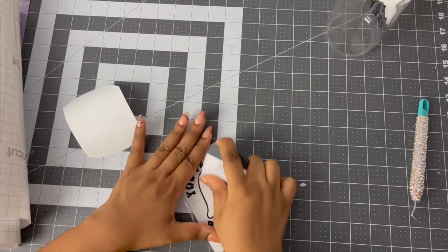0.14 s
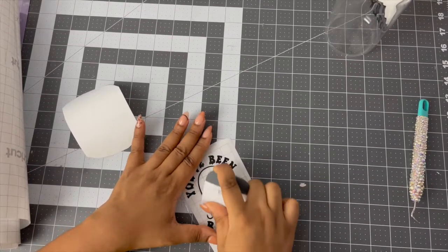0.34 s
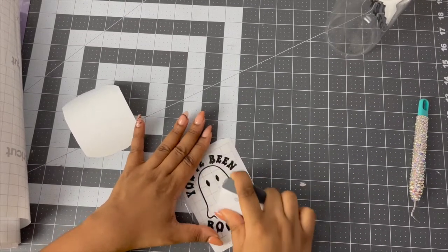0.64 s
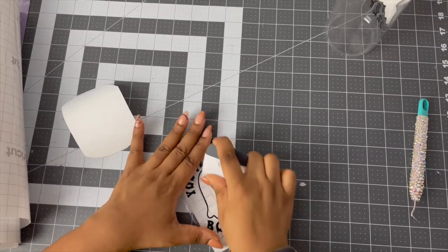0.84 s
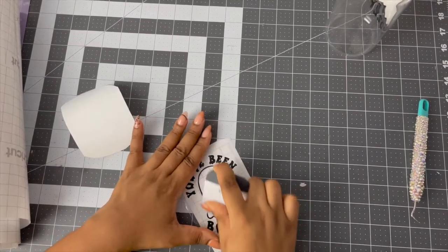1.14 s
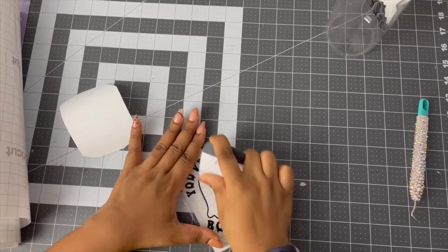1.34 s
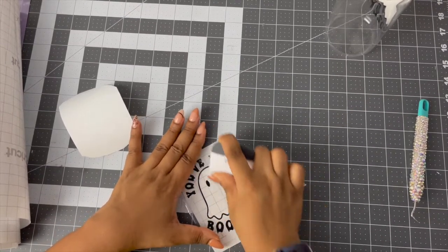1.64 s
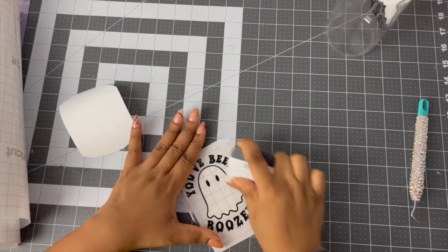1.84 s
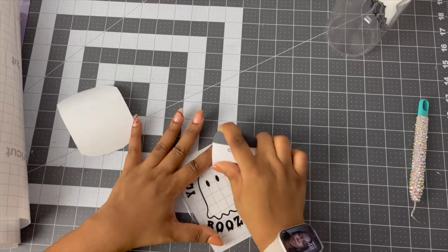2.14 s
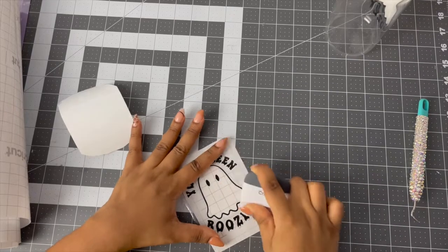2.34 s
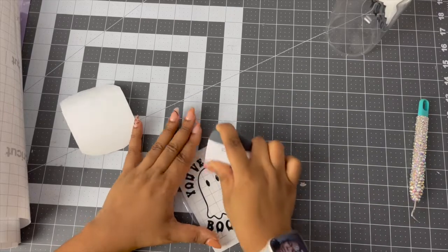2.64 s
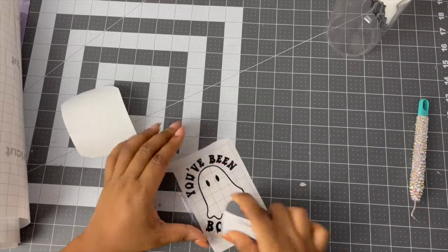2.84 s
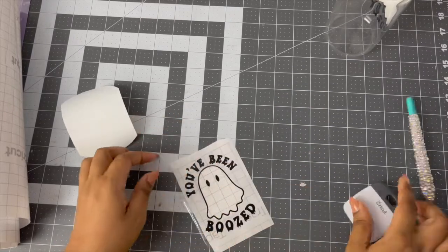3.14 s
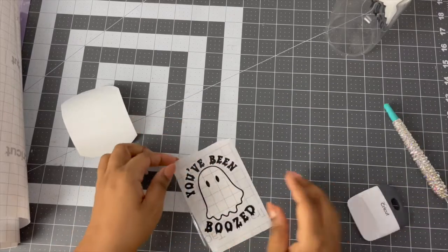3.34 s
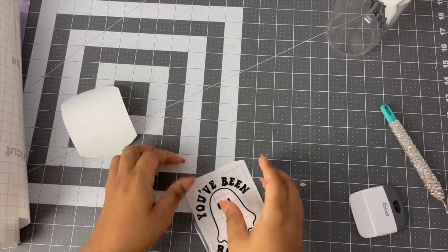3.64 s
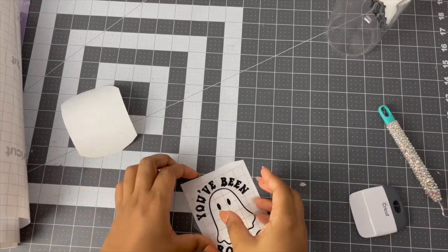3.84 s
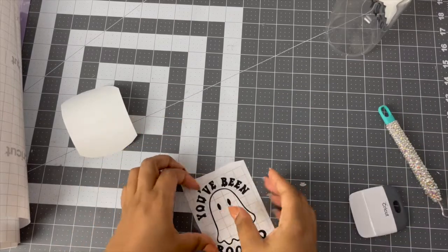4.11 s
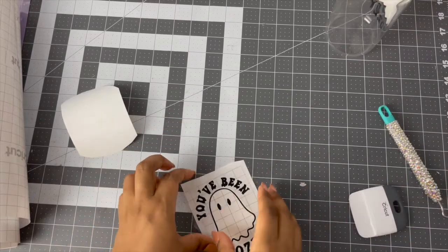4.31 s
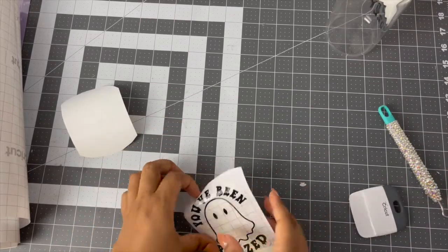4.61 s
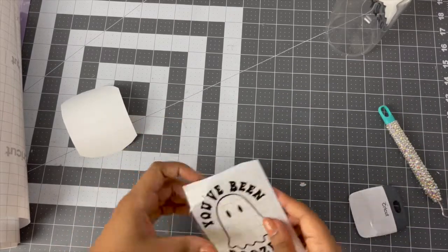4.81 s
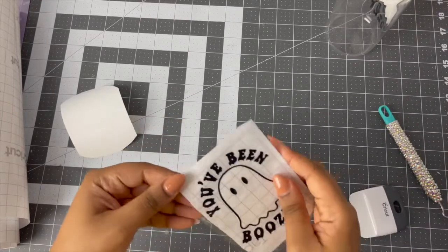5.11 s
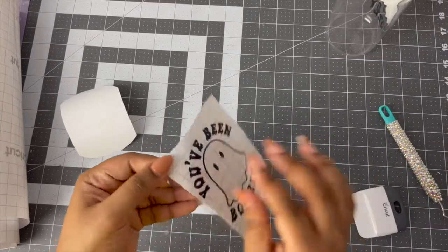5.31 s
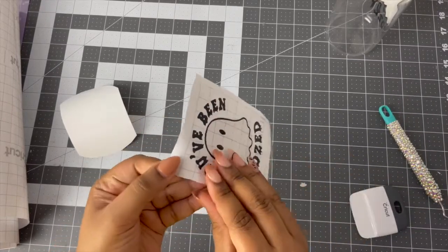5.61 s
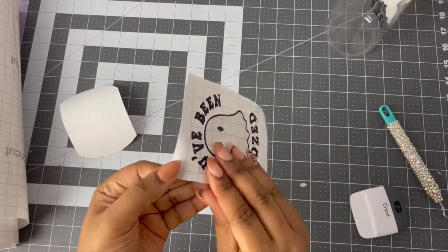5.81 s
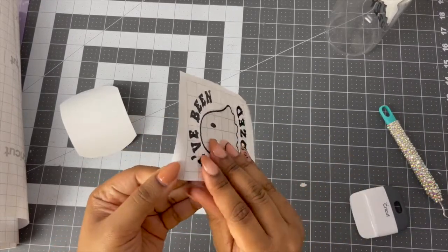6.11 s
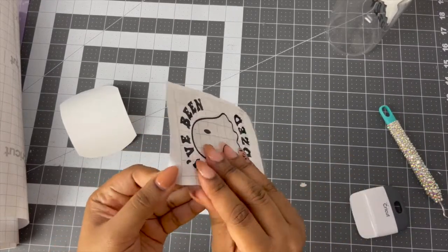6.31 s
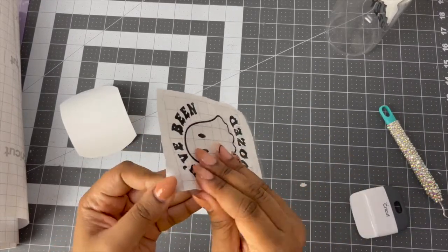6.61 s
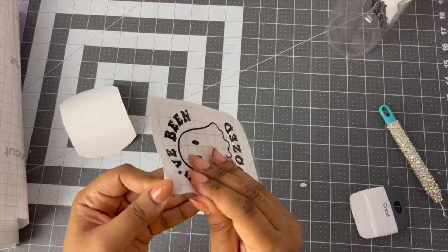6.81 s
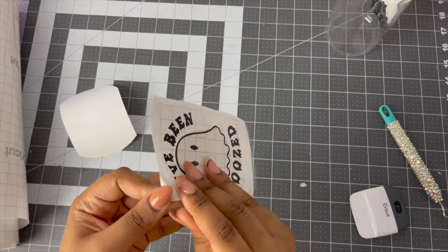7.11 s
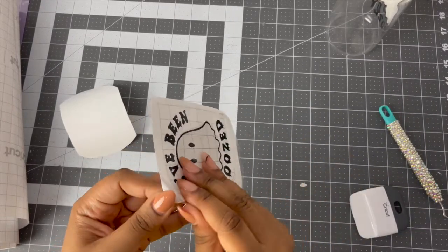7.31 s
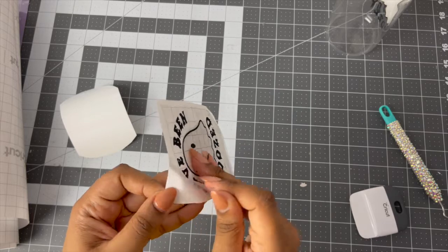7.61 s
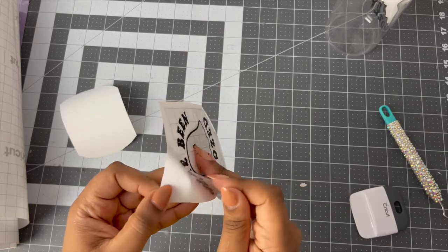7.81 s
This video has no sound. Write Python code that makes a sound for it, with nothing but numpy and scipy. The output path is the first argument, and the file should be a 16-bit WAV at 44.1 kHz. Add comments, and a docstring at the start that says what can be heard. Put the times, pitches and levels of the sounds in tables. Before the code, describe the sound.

A small room with low ventilation rumble and a faint wavering hum, heard close above a work desk. From 0 to about 2.75 s, a plastic scraper rubs to and fro over film at an even pace, nearly five passes a second; each hisses and rasps softly while the desk rumbles and bumps irregularly. Pressure grows around 1.6-1.9 s, a low thud comes at 2.0 s, and bright hard ticks stand out at 1.6, 1.77, 2.66 and 2.75 s. At 3.0-3.45 s the scraper is put down: a cluster of hollow knocks, a short drag, the loudest clack at 3.3 s. From 3.6 to 4.8 s stiff film snaps and crinkles, strongest near 3.94 and 4.38 s, with a knock at 4.06 s and brief scrapes. From 5 to 8 s only sparse small crackles, faint finger slides and tiny nail picks remain, a few bunching near 7.8 s.

```python
"""Scraping and picking at a decal on a cutting mat

A plastic scraper burnishes a vinyl decal: each stroke bumps the desk and hisses over the tape.
Then it is put down, the decal is slid off the mat, and its stiff film snaps and crinkles as a corner is picked.
Rubbing is filtered noise with tiny slips; knocks and snaps are short noise bursts that set resonances ringing.
A small room with a low hum is heard around it, through two closely spaced microphone ports.
"""
import sys
import numpy as np
from scipy import signal
from scipy.fft import rfft, irfft, next_fast_len
from scipy.io import wavfile

SR = 44100
rng = np.random.default_rng(int(sys.argv[2]) if len(sys.argv) > 2 else 0)


def log_audio(samples):
    """Write samples as a 16-bit WAV file to the path given in sys.argv[1]."""
    # one column per channel
    frames = np.atleast_2d(samples).T
    # limit to full scale, then quantise
    limited = np.clip(frames, -1, 1)
    pcm = np.round(limited * 32767).astype(np.int16)
    wavfile.write(sys.argv[1], SR, pcm)


N = 350595
TIME = np.arange(N) / SR

# Tone of hard, bright contacts: (frequency [Hz], relative level [dB])
TICK_TONE = [(900, -19.5), (3500, -14.5), (6200, -2), (8300, -7.5), (10400, 9), (11700, -4), (16000, -34)]
# Resonances of the desk: (frequency [Hz], width [Hz], relative level [dB])
DESK_MODES = [(223, 46.3, 9), (331, 29.8, 3), (397.6, 30, 5), (481.3, 27, 2.5), (573, 67, -6)]
# Lowest resonances of the desk: (frequency [Hz], width [Hz], relative level [dB])
DESK_BOOM_MODES = [(118.7, 3.9, 17), (62, 8.7, 4)]
# Resonances of the mat: (frequency [Hz], width [Hz], relative level [dB])
MAT_MODES = [(656, 110, 27.7), (950, 25, 5.8), (1098, 140, 22), (2070, 510, 12.9)]
# Resonances of the bending film: (frequency [Hz], width [Hz], relative level [dB])
FILM_BEND_MODES = [(2090, 420, 0.5), (2870, 800, 0), (3700, 600, 0), (4500, 600, -3)]
# Scraper, card and nails knock on the mat: (time [s], level [dB], level of the desk thump [dB])
MAT_KNOCKS = [(3.0013, -33, -49), (3.0392, -36.5, -53), (3.0518, -33.5, -45), (3.1052, -33.5, -46.5),
              (3.1309, -38.5, -51.5), (3.249, -47, -52.5), (3.3085, -21.5, -51), (3.4331, -38, -45.5),
              (4.0607, -30, -56), (4.365, -48, -49.5)]


def from_db(db):
    """Decibels to gain."""
    return 10 ** (np.asarray(db) / 20)


def rms_one(x):
    """Scale to an average (rms) level of 1."""
    return x / np.sqrt(np.mean(x ** 2) + 1e-20)


def at_hz(points, hz):
    """Read a table between its points, on a log-frequency axis."""
    known, values = np.transpose(points)
    return np.interp(np.log(np.maximum(hz, 1)), np.log(known), values)


def add(track, s, sound):
    """Mix a sound into a track at time s."""
    start = max(round(s * SR), 0)
    track[start:start + len(sound)] += sound[:N - start]


def drift(per_s):
    """Random wandering with spread 1: straight lines between chance values, per_s of them a second."""
    knots = rng.standard_normal(4000)
    return rms_one(np.interp(TIME * per_s, np.arange(len(knots)), knots))


def colour(x, spectrum):
    """Filter to the given spectrum without sounding early, falling away below its first point."""
    size = next_fast_len(2 * len(x), True)
    hz = np.arange(size // 2 + 1) * SR / size
    gain = from_db(at_hz(spectrum, hz)) * np.clip(hz / spectrum[0][0], 1 / 20, 1) ** 2
    # folding the cepstrum gives the minimum-phase version of this gain
    cepstrum = irfft(np.log(gain), size)
    cepstrum[1:size // 2] *= 2
    cepstrum[size // 2 + 1:] = 0
    response = np.exp(rfft(cepstrum))
    return irfft(rfft(x, size) * response, size)[:len(x)]


def resonate(x, modes):
    """Let resonances ring side by side, with alternating sign; a narrow one rings longer."""
    out = 0
    for k, (hz, width, db) in enumerate(modes):
        r = np.exp(-np.pi * width / SR)
        poles = [1, -2 * r * np.cos(2 * np.pi * hz / SR), r * r]
        ring = signal.lfilter([1, 0, -1], poles, x + 1e-18)
        out = out + (-1) ** k * from_db(db) * (1 - r * r) / 2 * ring
    return out


def cut(x, hz, kind, order=2):
    """Butterworth filter: "low" keeps what lies below hz, "high" what lies above."""
    return signal.sosfilt(signal.butter(order, min(hz, SR / 2 - 1), kind, fs=SR, output="sos"), x)


def sized(x, db, span_s):
    """Give a short sound the energy of a level db held for span_s."""
    return from_db(db) * x * np.sqrt(span_s * SR / (np.sum(x ** 2) + 1e-20))


def slips(per_s, spread_db, count):
    """Tiny slips at random moments, of uneven size and sign."""
    sizes = from_db(spread_db * np.minimum(rng.exponential(1, count), 4))
    happens = rng.random(count) < per_s / SR
    return sizes * rng.choice([-1, 1], count) * happens


def buckle(settle_s, flutter):
    """One sudden jump, then a dying flutter of random ones."""
    t = TIME[:SR // 10]
    jumps = rng.standard_normal(len(t)) * (np.exp(-t / settle_s) + flutter * np.exp(-t / 0.0096))
    jumps[0] = 2
    return jumps


def ports(x):
    """The right port lags the left, most around two treble resonances; the left is slightly louder."""
    right = x
    for hz, width in [(4750, 150), (9500, 4000)]:
        r = np.exp(-np.pi * width / SR)
        poles = [1, -2 * r * np.cos(2 * np.pi * hz / SR), r * r]
        right = signal.lfilter(poles[::-1], poles, right)  # all-pass: delays without changing the level
    return np.array([x * from_db(0.63), right])


def diffuse(common, apart, apart_db):
    """Sound from all around: a shared part, plus a part of opposite sign at the two ports."""
    # Tone of the part that differs between the ports: (frequency [Hz], relative level [dB])
    apart_tone = [(300, -5), (700, 8), (1250, -2), (3300, 4), (6000, 3.5), (12000, -31.5)]
    return ports(common) + from_db(apart_db) * ports(colour(apart, apart_tone)) * [[1], [-1]]


def background():
    """Low ventilation rumble from filtered noise, with a wavering hum of noise through narrow resonances."""
    # Tone of the rumble: (frequency [Hz], relative level [dB])
    room_tone = [(25, -32), (45, -3.5), (80, -11), (150, -20), (230, -17), (290, -30), (450, -24.5),
                 (630, -44), (2100, -50), (5000, -61), (11000, -59), (14000, -92)]
    # Hum resonances: (frequency [Hz], width [Hz], relative level [dB])
    hum_modes = [(60.2, 5.2, 1), (123.17, 2.4, 0.41)]
    common, apart = (rms_one(colour(rng.standard_normal(N), room_tone)) for _ in range(2))
    hum = rms_one(cut(resonate(rng.standard_normal(N), hum_modes), 270, "low"))
    return from_db(-50.0) * diffuse(common, apart, apart_db=-3.0) + from_db(-51.5) * hum


def room(x):
    """Dense reflections: bands of noise that each die away at their own rate."""
    # Time for reflections to fall by 60 dB: (frequency [Hz], time [s])
    decay_times = [(1000, 0.66), (6000, 0.34), (11000, 0.34), (16000, 0.081)]
    t, edges = TIME[:SR // 2], np.geomspace(80, 16000, 9)
    tails = np.zeros((2, len(t)))
    for low, high in zip(edges, edges[1:]):
        band = cut(rng.standard_normal(tails.shape), low, "high", order=4)
        band = cut(band, high, "low", order=4)
        tails += band * from_db(-60 * t / at_hz(decay_times, np.sqrt(low * high)))
    tails *= 1 - np.exp(-(t / 0.0007) ** 2)  # soft start
    common, apart = (signal.fftconvolve(x, tail / np.linalg.norm(tail))[:N] for tail in tails)
    return diffuse(common, apart, apart_db=-2.5)


def pressure_db(s):
    """How hard the scraper is pressed at time s."""
    # Pressure on the scraper: (time [s], level [dB])
    pressing = [(0.1, 2.5), (0.7, -2), (0.95, 1.5), (1.4, 4), (1.62, 7), (1.83, 10.5), (2.05, 0),
                (2.45, 4.5), (2.65, 8)]
    return np.interp(s, *np.transpose(pressing))


def speed(start, end):
    """A pass gathers speed and slows again towards its end."""
    out, inside = np.zeros(N), (TIME > start) & (TIME < end)
    out[inside] = np.sin(np.pi * (TIME[inside] - start) / (end - start)) ** 0.82
    return out


def burnishing():
    """Effort of the scraper, to and fro at an even pace: speed times pressure, a little more on each way back."""
    first_s, pass_s, passes = 0.022, 0.2115, 13
    return_gain_db = 1
    moving = np.zeros(N)
    for k in range(passes):
        start = first_s + pass_s * k
        moving += from_db(return_gain_db * (k % 2)) * speed(start, start + pass_s)
    return moving * from_db(pressure_db(TIME))


def rumble():
    """The desk rumbles unevenly under the moving scraper, and sways once with a thud as the hand leans in."""
    uneven = rng.standard_normal(N) * from_db(6.3 * drift(35))
    out = from_db(-50.5) * burnishing() * rms_one(cut(resonate(uneven, DESK_MODES), 1200, "low"))
    thud_s, thud_db = 1.995, -38
    age = TIME[:SR // 2] / 0.027
    push = rng.standard_normal(len(age)) * age * np.exp(-age)
    sway = resonate(push, [(56.4, 16, 0)])  # frequency Hz, width Hz, dB
    add(out, thud_s, sized(cut(sway, 110, "low"), thud_db, 0.073))
    return out


def bump(ring_db, chatter_db, boom_db):
    """An edge judders along: the mat chatters first, the desk rings, and its lowest modes swell last."""
    t = TIME[:SR // 2]
    age = t / 0.039
    # the edge catches about 140 times a second, each catch a short burst
    catches = np.abs(slips(140, 0.75, len(t)))
    catches[0] = 2
    grip = 0.55 + signal.lfilter([1], [1, -np.exp(-1 / (0.0015 * SR))], catches + 1e-18)
    judder = grip * rng.standard_normal(len(t))
    rise_s = 0.0017
    scrape = judder * (1 - np.exp(-t / rise_s)) * np.exp(-1.9 * age)
    chatter = rms_one(cut(resonate(scrape, MAT_MODES), 3600, "low", order=4))
    grit = rms_one(cut(cut(scrape, 1700, "high"), 2900, "low", order=4))
    chatter = chatter + from_db(-8.5) * grit
    modes = [(hz, width, db + 2 * rng.normal()) for hz, width, db in DESK_MODES]  # each spot rings differently
    ring = cut(resonate(judder * age ** .5 * np.exp(-2.4 * age), modes), 1100, "low")
    boom = cut(resonate(judder * age * np.exp(-age), DESK_BOOM_MODES), 170, "low")
    return sized(chatter, chatter_db, 0.08) + sized(ring, ring_db, 0.041) + sized(boom, boom_db, 0.05)


def desk():
    """The desk booms under the moving scraper and is bumped by its catches and by the knocks."""
    # The scraper edge catches and bumps the desk: (time [s], level [dB])
    edge_bumps = [(0.072, -42), (0.204, -44), (0.573, -47), (0.87, -42.5), (0.961, -35.5), (1.072, -40),
                  (1.273, -43.5), (1.388, -40.5), (1.524, -42.5), (1.814, -36), (1.982, -34.5),
                  (2.238, -36), (2.389, -39.5), (2.609, -39.5), (2.719, -38.5)]
    boom = rms_one(cut(resonate(rng.standard_normal(N), DESK_BOOM_MODES), 380, "low"))
    out = from_db(-49.5) * np.sqrt(burnishing()) * boom
    for s, db in edge_bumps:
        # under pressure a bump chatters more and booms less
        chatter_db = -34.5 + 0.81 * db + 1.7 * pressure_db(s)
        boom_db = -9 + 0.68 * db - 1.84 * pressure_db(s)
        add(out, s, bump(db, chatter_db, boom_db))
    for s, _, db in MAT_KNOCKS:
        add(out, s, bump(db, chatter_db=db - 4.5, boom_db=db + 6.5))
    return out


def thumps():
    """A blunt landing: one short push sets the mat and the desk ringing."""
    # Scraper edge and fingertips land on the mat: (time [s], level [dB])
    landings = [(0.968, -48.5), (1.187, -45.5), (1.544, -44), (1.636, -41), (2.605, -37), (3.069, -35),
                (3.408, -41.5), (3.5093, -38.5), (4.274, -43), (6.6076, -58), (7.662, -52)]
    span_s, desk_db = 0.0059, 2.5
    out = np.zeros(N)
    for s, db in landings:
        push = buckle(settle_s=0.003, flutter=0.5)
        mat = sized(cut(resonate(push, MAT_MODES), 2200, "low"), db, span_s)
        wood = sized(cut(resonate(push, DESK_MODES), 700, "low"), db + desk_db, span_s)
        add(out, s, mat + wood)
    return out


def ticks():
    """Hard, bright contacts on the taut tape: short bursts of filtered noise."""
    # Sharp ticks of nails and scraper edge: (time [s], relative level [dB])
    sharp_contacts = [(0.1716, -43), (0.637, -45), (1.4027, -40), (1.6, -23), (1.7732, -19.5), (2.444, -40),
                      (2.58, -43), (2.6588, -15), (2.7513, -22.5), (5.142, -41), (7.1504, -47.5),
                      (7.554, -36), (7.7967, -43), (7.811, -40), (7.834, -42), (7.8546, -30)]
    out = np.zeros(N)
    for s, db in sharp_contacts:
        contact = colour(buckle(settle_s=0.0041, flutter=0.14), TICK_TONE)
        add(out, s, sized(contact, db - 8.5, 0.015))
    return out


def buckles(jolts, body_modes):
    """Each jolt shakes the body it meets, the bend that gives way, the rest of the sheet and its edge."""
    lead_in_s = 0.0075
    out, lead = np.zeros(N), round(lead_in_s * SR)
    for s, bend_db, body_db, crack_db, bend_hz in jolts:
        # a few milliseconds of soft noise swell into each jolt, which then settles in small crackles
        release = buckle(settle_s=0.0023, flutter=0.59)
        release += 1.7 * slips(220, 5.7, len(release)) * np.exp(-TIME[:len(release)] / 0.015)
        lead_in = 0.22 * rng.standard_normal(lead) * np.linspace(0, 1, lead) ** 2
        jolt, start = np.concatenate([lead_in, release]), s - lead / SR
        sheet_modes = [(hz, width, db + 2 * rng.normal()) for hz, width, db in FILM_BEND_MODES]
        bends = resonate(jolt, sheet_modes)
        bends += resonate(jolt, [(bend_hz, 255, 7.5)])  # the bend that gives way
        body = cut(resonate(jolt, body_modes), 1380, "low")
        crack = cut(colour(jolt, TICK_TONE), 9850, "low", order=5)
        add(out, start, sized(body, body_db, 0.0032))
        add(out, start, sized(cut(bends, 5600, "low"), bend_db, 0.0027))
        add(out, start, sized(crack, crack_db, 0.0074))
    return out


def knocks():
    """Knocks ring mostly in the hollow of the mat, and less in the bends of the film."""
    # Hollow ring of the mat: (frequency [Hz], width [Hz], relative level [dB])
    hollow_modes = [(952, 110, -5), (1197, 78, 7.5)]
    lowest_bend_hz = FILM_BEND_MODES[0][0]
    jolts = [(s, db - 6, db, db - 10.5, lowest_bend_hz) for s, db, _ in MAT_KNOCKS]
    return buckles(jolts, hollow_modes)


def snaps():
    """Snaps ring mostly in the bends of the film, each with its own sharpness and pitch."""
    # The film snaps as it bends: (time [s], relative level [dB], treble level [dB], pitch of the bend [Hz])
    film_snaps = [(3.6213, -39.5, -57.5, 3040), (3.676, -38, -62, 1980), (3.94, -26, -36.5, 2510),
                  (4.1137, -35, -48, 1910), (4.2896, -35, -53, 2000), (4.3825, -23.5, -29, 2100),
                  (4.6279, -36, -46.5, 2000), (4.654, -29, -42, 1250), (4.661, -32.5, -28, 2150),
                  (4.733, -37, -40.5, 3140), (5.1165, -37, -52, 1850), (5.284, -45, -58.5, 1640),
                  (5.37, -35.5, -49, 1610), (5.6176, -47.5, -33.5, 2500), (6.249, -48.5, -50.5, 2240),
                  (6.8641, -37, -41, 2330), (7.217, -44, -50.5, 2110), (7.5102, -37.5, -38, 2150),
                  (7.7702, -41.5, -80, 2450), (7.884, -49, -43.5, 3340)]
    # Body of the film: (frequency [Hz], width [Hz], relative level [dB])
    film_modes = [(537, 930, 0.2), (1360, 430, -0.46), (1920, 133, -1.6)]
    jolts = [(s, db - 2.5, db - 8, treble_db, hz) for s, db, treble_db, hz in film_snaps]
    return buckles(jolts, film_modes)


def friction(gain, spectrum, grains_per_s, grain_db):
    """Sliding contact: separate catches over a smooth hiss, under a wavering pressure."""
    grains = rms_one(slips(grains_per_s, grain_db, N)) + rng.standard_normal(N)
    pressure = from_db(3.1 * drift(34))
    return gain * rms_one(colour(grains * pressure, spectrum))


def strokes(moves):
    """Strength of several sliding moves, each following the speed of the hand."""
    return sum(from_db(db) * speed(start, end) for start, end, db in moves)


def rubbing():
    """Sliding on the film hisses, rasps and crinkles it; dragging over the mat has a hollow tone."""
    # Fingers and backing slide over the film: (start [s], end [s], relative level [dB])
    finger_slides = [(2.66, 2.75, -53.5), (3.045, 3.154, -61), (3.254, 3.46, -50), (3.684, 3.856, -60.5),
                     (3.986, 4.622, -75), (4.58, 4.773, -56.5), (5.079, 5.196, -58.5), (5.393, 5.487, -60),
                     (5.51, 5.757, -68), (5.733, 5.845, -63), (6.143, 6.691, -69.5), (6.757, 7.2, -72),
                     (7.775, 7.93, -66)]
    # Card and scraper dragged over the mat: (start [s], end [s], level [dB])
    mat_drags = [(3.019, 3.13, -41), (3.136, 3.275, -55), (4.066, 4.4, -57), (4.352, 4.403, -43.5),
                 (4.49, 4.6, -41.5)]
    # Scraper or finger grips and rasps on the sheet: (start [s], end [s], level [dB])
    sheet_grips = [(0.87, 0.96, -60.5), (1.077, 1.33, -64), (1.197, 1.226, -55), (1.788, 1.857, -54.5),
                   (2.559, 2.71, -51.5), (4.7, 4.745, -51), (5.501, 5.524, -60.5), (5.53, 5.56, -62.5),
                   (6.195, 6.52, -74), (6.547, 6.88, -80), (7.015, 7.144, -72)]
    # Tones of the fine hiss, the coarser rasp and the drag: (frequency [Hz], relative level [dB])
    hiss_tone = [(3000, 2), (4600, -5.5), (6500, 3), (10700, 2.5), (12300, -15.5), (15000, -48)]
    rasp_tone = [(750, 5.5), (1250, -2.5), (1500, 2), (1750, -6), (2150, 3), (2700, -19.5), (3300, -11),
                 (14000, -47)]
    drag_tone = [(700, -17), (1030, -8), (1220, 2), (1550, -9.5), (2000, -16.5), (3000, -15.5),
                 (10500, -25.5), (14000, -66)]
    # The sheet rings under a sliding finger: (frequency [Hz], width [Hz], relative level [dB])
    sheet_modes = [(1530, 44, -2), (2090, 220, -0.5), (2780, 260, -6.5), (3350, 500, -7)]
    scraper, fingers, drag = burnishing(), strokes(finger_slides), strokes(mat_drags)
    hiss = from_db(-65) * scraper + fingers
    rasp = from_db(-68) * scraper + from_db(-2.5) * fingers
    crinkles = fingers * rms_one(cut(resonate(slips(700, 5.7, N), FILM_BEND_MODES), 4900, "low"))
    grip = from_db(-17.5) * fingers + strokes(sheet_grips)
    sheet = grip * rms_one(cut(resonate(slips(4430, 3, N), sheet_modes), 4500, "low"))
    return (friction(hiss, hiss_tone, grains_per_s=810, grain_db=0.0)
            + friction(rasp, rasp_tone, grains_per_s=570, grain_db=7.5)
            + friction(drag, drag_tone, grains_per_s=1500, grain_db=2.0)
            + from_db(-5) * crinkles + sheet)


def scene():
    """Hands at work just under the microphone, in a small room."""
    work = rumble() + desk() + thumps() + ticks() + knocks() + snaps() + rubbing()
    return background() + from_db(-15.0) * room(work) + ports(work)


def record(dry):
    """The top is cut steeply above 16200 Hz."""
    return signal.sosfilt(signal.ellip(10, .1, 80, 16200, fs=SR, output="sos"), dry)


dry = scene()
out = record(dry)
log_audio(out)
```